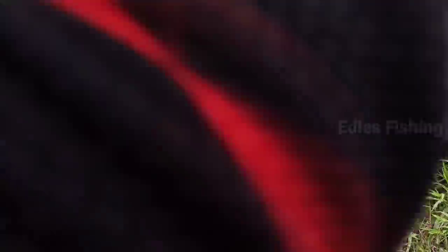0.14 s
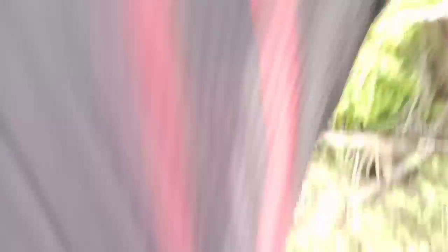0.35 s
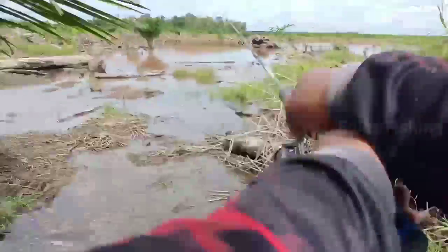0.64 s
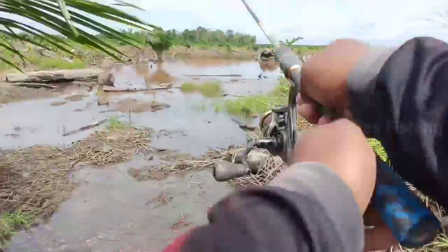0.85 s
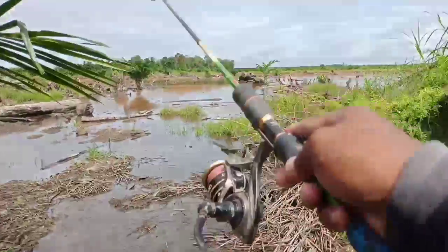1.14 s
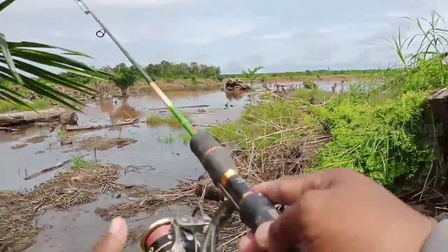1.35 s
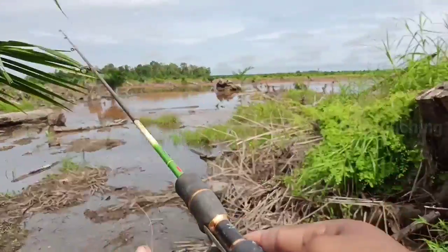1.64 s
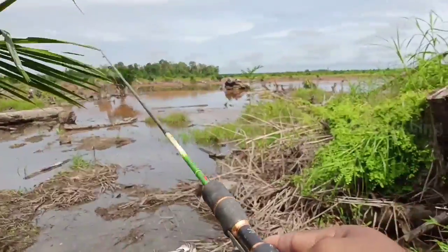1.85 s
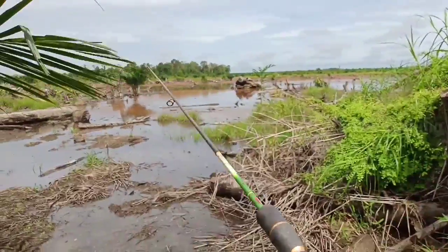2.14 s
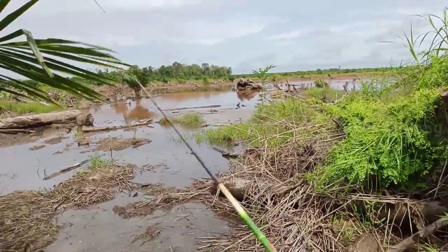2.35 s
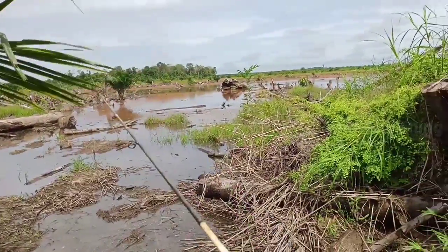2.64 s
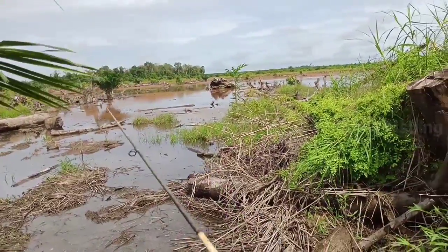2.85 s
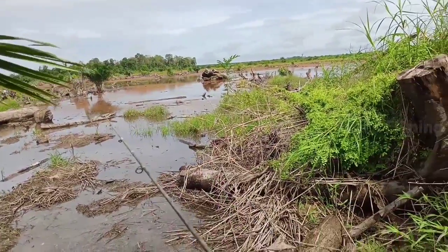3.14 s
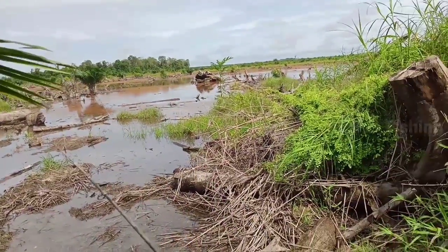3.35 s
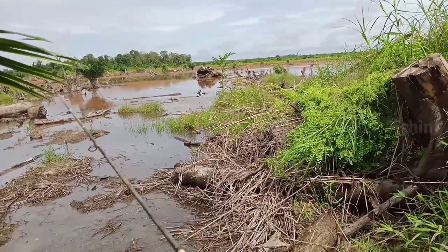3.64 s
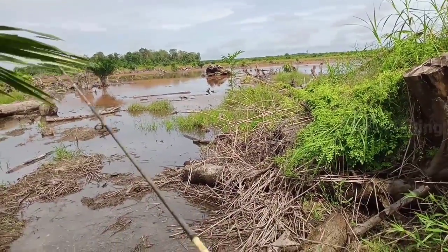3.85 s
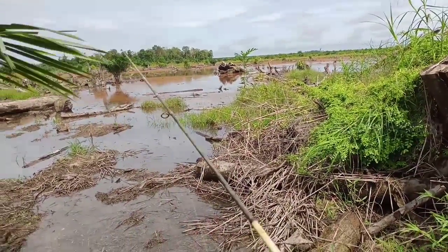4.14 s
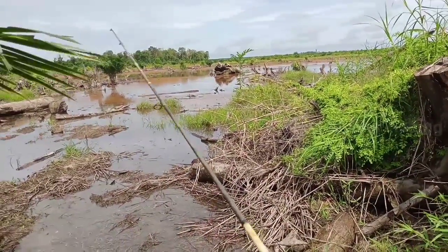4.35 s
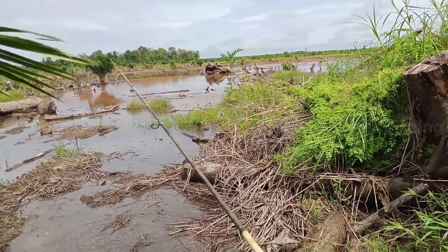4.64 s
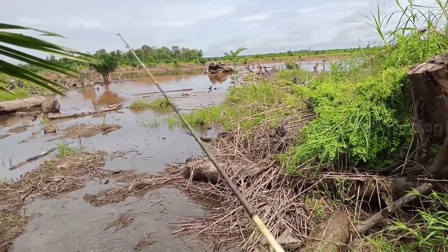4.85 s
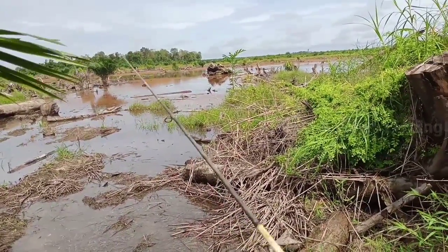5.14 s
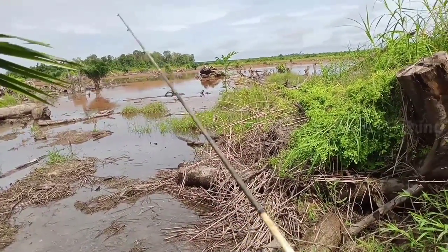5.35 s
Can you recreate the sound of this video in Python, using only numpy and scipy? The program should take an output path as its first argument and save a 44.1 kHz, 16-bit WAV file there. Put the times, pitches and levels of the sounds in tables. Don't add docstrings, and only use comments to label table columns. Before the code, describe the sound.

Outdoors at a swamp, with the microphone on the angler's chest. A high, thin cricket whine, a hissing band of far katydids and soft air noise run throughout. A frog gives four quick falling chirps in two pairs, about every 0.6 seconds, faint near the cast. After a small click at 0.27, the sleeve rustles and at 0.4 to 0.5 sweeps past in a loud rush of crackling cloth snaps, with the rod's brief whip. From 0.58 to 0.85 the spool rattles rapidly, metallic and dry, then thins to scattered ticks until about 1.7. A dull strap bump comes at 1.57. At 1.8 the bail snaps shut, a bright bouncing clack. Handle clicks follow at 3.17 and, harder, 3.33, then lighter ones at 3.83 and a tiny line squeak at 4.03. Cloth shifts softly. Distant birds whistle from 2.3 and rasp huskily from 4.0 to 5.1. Light puffs brush the microphone.

```python
import sys
import numpy as np
from scipy import signal
from scipy.fft import rfft, irfft, next_fast_len
from scipy.io import wavfile
from scipy.ndimage import map_coordinates

SR = 44100
rng = np.random.default_rng(int(sys.argv[2]) if len(sys.argv) > 2 else 0)


def volts_from_db(level):
    exponent = np.asarray(level, float) / 20
    return 10 ** exponent


def put_to_file(sound):
    columns = np.atleast_2d(sound).T
    safe = np.clip(columns, -1, 1)
    whole_steps = np.round(safe * 32767)
    wavfile.write(sys.argv[1], SR, whole_steps.astype(np.int16))


N = 242550

# (time [s], effort [dB], brightness [dB])
CAST = [
    (0, -56.5, 6),
    (.24, -54, 2.5),
    (.34, -48, 4),
    (.4, -46.5, -5.5),
    (.426, -41.5, -2),
    (.434, -32, -3),
    (.455, -29, -3),
    (.495, -35, 3),
    (.55, -45, 6),
]
EFFORT_DB = -54
# (time [s], peak [dB], mode [Hz])
RATTLE = [(0.5774, -34, 2150), (0.5901, -35, 2380), (0.6044, -38, 2440), (0.6164, -33, 2150),
          (0.6244, -34, 2400), (0.6374, -32, 2490), (0.6514, -39, 2860), (0.6663, -35, 2540),
          (0.6796, -29, 2420), (0.6914, -33, 2830), (0.7056, -25, 2400), (0.7174, -30, 2040),
          (0.732, -26, 2820), (0.7438, -31, 2920), (0.7612, -33, 2450), (0.7764, -34, 2420),
          (0.7816, -29, 2400), (0.7914, -33, 2400), (0.7981, -27, 2820), (0.8074, -29, 2420),
          (0.8154, -31, 2760), (0.8244, -33, 2380), (0.851, -37, 2380), (0.868, -29.5, 2580),
          (0.9168, -32, 2770), (0.9672, -33, 2520), (1.0026, -37, 2500), (1.0211, -34, 2850),
          (1.0959, -38, 2850), (1.116, -42, 2510), (1.1383, -49, 2080), (1.1588, -39, 2850),
          (1.162, -43, 2490), (1.1865, -31.5, 2500), (1.2545, -49, 2110), (1.2757, -39, 2870),
          (1.3106, -36.5, 2850), (1.5728, -40, 2860)]


def unit(x):
    return x / np.sqrt(np.mean(x ** 2) + 1e-20)


def noise():
    return rng.standard_normal(N)


def curves(rows):
    s, *cols = np.transpose(rows)
    return [np.interp(np.arange(N) / SR, s, c) for c in cols]


def wobble(rate_hz):
    coarse = np.arange(0, N + 8, 8)
    knots = rng.standard_normal(int(N * rate_hz / SR) + 4)
    smooth = map_coordinates(knots, [coarse * rate_hz / SR])
    return np.interp(np.arange(N), coarse, smooth)


def swells(rows, fade_db_per_s):
    t = np.arange(0, N + 32, 32) / SR
    gains = []
    for s, hold_s, db, *_ in rows:
        outside_s = np.maximum(np.maximum(s - t, t - s - hold_s), 0)
        gains.append(np.interp(np.arange(N) / SR, t, volts_from_db(db - fade_db_per_s * outside_s)))
    return gains


def filtered(x, response):
    m = next_fast_len(N + 8192)
    return irfft(rfft(x, m) * response(np.fft.rfftfreq(m, 1 / SR)), m)[:N]


def coloured(x, spectrum):
    f, db = np.transpose(spectrum)
    return unit(filtered(x, lambda hz: volts_from_db(np.interp(np.log(hz + 1), np.log(f), db))))


def ringing(x, modes):
    def response(f):
        total = 0
        for k, (hz, width_hz, db) in enumerate(modes):
            damping = 1j * f * width_hz
            total = total + (-1) ** k * volts_from_db(db) * damping / (hz * hz - f * f + damping)
        return total
    return filtered(x, response)


def add(out, s, burst):
    at = round(s * SR) + np.arange(len(burst))
    keep = (at >= 0) & (at < N)
    out[at[keep]] += burst[keep]


def glide(hz, rough_db=0):
    n = len(hz)
    flutter = np.interp(np.linspace(0, n * 250 / SR, n), np.arange(64), rng.standard_normal(64))
    edge_s = np.minimum(np.arange(n), np.arange(n)[::-1]) / SR
    tone = np.sin(2 * np.pi * np.cumsum(hz) / SR)
    return tone * np.minimum(edge_s / .004, 1) * volts_from_db(rough_db * flutter)


def puffs(rows):
    out, hiss = np.zeros(N), rng.standard_normal(SR // 4)
    for s, length_s, hz, width_hz, db in rows:
        band = signal.butter(2, [hz - width_hz / 2, hz + width_hz / 2], "bandpass", fs=SR)
        burst = unit(signal.lfilter(*band, rng.permutation(hiss)))[-int(length_s * SR):]
        add(out, s, volts_from_db(db) * burst * np.hanning(len(burst)) ** 0.32)
    return out


def crack(t60_s, tail_t60_s, tail_db):
    t = np.arange(SR // 12) / SR
    blow = 5 * (t == 0)
    decay = volts_from_db(-60 * t / t60_s) + volts_from_db(tail_db - 60 * t / tail_t60_s)
    return blow + decay * rng.standard_normal(len(t))


def background():
    # (frequency [Hz], density [dB/Hz])
    air_spectrum = [(20, -43.5), (33, -46), (48, 3), (65, 2.5), (120, -6), (400, -15.5), (1500, -20),
                    (3500, -25.5), (4300, -27), (5000, -35), (6600, -27), (10500, -32), (13500, -52),
                    (15400, -40)]
    # (frequency [Hz], density [dB/Hz])
    port_spectrum = [(50, -32), (110, 1.5), (170, -1), (270, 3), (420, -9), (700, -46)]
    # (time [s], hold [s], level [dB])
    gusts = [
        (1.15, 0.009, -51.5),
        (1.32, 0.0585, -64),
        (1.58, 0.0091, -64),
        (1.82, 0.0043, -45.5),
        (2.1, 0.17, -59),
        (2.66, 0.012, -51),
    ]
    # (frequency [Hz], width [Hz], level [dB])
    katydids = [(7940, 770, -3), (8250, 140, 2.5), (8600, 330, -3.5), (9157, 520, -0.5), (9630, 440, -5)]
    air = coloured(noise(), air_spectrum) * volts_from_db(-56.5 + 1.3 * wobble(2.72))
    effort_db = curves(CAST + [(.62, -60.5, 0)])[0]
    draught = volts_from_db(-63 + 1.295 * (effort_db - EFFORT_DB))
    push = volts_from_db(-67) + draught + sum(swells(gusts, fade_db_per_s=265))
    breeze = coloured(noise(), port_spectrum) * push * volts_from_db(-5.5 + 2.4 * wobble(8.9))
    chorus = unit(ringing(ringing(noise(), katydids), katydids))
    return air + breeze + chorus * volts_from_db(-64 + 0.38 * wobble(3.96) + 2.2 * wobble(30))


def crickets():
    # (wing [Hz], chirps [1/s], pitch wander [Hz], neighbour share [ratio])
    wings = [
        (5741, 11.5, 7, .55),
        (5602, 12.5, 8, .7),
        (5435, 9, 12, .6),
        (12620, 7, 8, .3),
    ]
    # (time [s], first singer [dB], second singer [dB])
    song = [(0, -60, -62), (.6, -58, -97), (1.3, -58, -58.5), (1.6, -57, -64), (1.9, -60, -74),
            (2.2, -53.5, -58.5), (2.6, -56.5, -66), (3, -62.5, -63.5), (3.5, -65, -61.5), (4, -59.5, -59),
            (4.45, -62, -63), (5.1, -60, -63.5), (5.5, -63, -56.5)]
    # (time [s], hold [s], level [dB])
    low_bouts = [
        (1.3, 0.085, -79.5),
        (4.2, 0.44, -75),
        (5.1, .4, -74.5),
    ]
    # (time [s], hold [s], level [dB])
    high_bouts = [
        (2.6, .1, -93.5),
        (3.85, .5, -86.5),
    ]
    # (frequency [Hz], density [dB/Hz])
    crowd_spectrum = [(5250, -40), (5380, -10), (5520, -3), (5600, 0), (5680, -1), (5790, 0), (5830, -25),
                      (5950, -50)]
    first_db, second_db = curves(song)
    low = volts_from_db(-79.5) + sum(swells(low_bouts, fade_db_per_s=40))
    high = volts_from_db(-100) + sum(swells(high_bouts, fade_db_per_s=40))
    gains = [volts_from_db(first_db), volts_from_db(second_db), low, high]
    crowd_db = -66 - 0.4 * np.clip(second_db - second_db.mean(), -7, 9)
    out = volts_from_db(crowd_db + 1.2 * wobble(20)) * coloured(noise(), crowd_spectrum)
    for (hz, rate_hz, wander_hz, share), gain in zip(wings, gains):
        beat = np.cumsum(rate_hz * (1 + 0.125 * wobble(5))) / SR % 1
        gate = np.clip(1.9 * np.sin(np.pi * beat), 0, 1) ** 1.04
        pitch_hz = hz + wander_hz * wobble(30) + .8 * wander_hz * wobble(2)
        pitch_hz = pitch_hz - 14 * (beat - .5)
        near = gate * volts_from_db(1.22 * wobble(13)) * np.sin(2 * np.pi * np.cumsum(pitch_hz) / SR)
        phase = 2 * np.pi * hz * np.arange(N) / SR
        others = wobble(80) * np.cos(phase) + wobble(80) * np.sin(phase)
        out += gain * unit(unit(near) + share * unit(others))
    return out


def cloth():
    # (time [s], effort [dB], brightness [dB])
    follow = [
        (.732, -43, 10.5),
        (.84, -48.5, 12),
        (1.0, -49, 11),
        (1.19, -52, 5),
        (1.22, -56.5, 6),
        (1.68, -59, 4.5),
        (1.9, -66, 7),
        (1.93, -88, -9.5),
    ]
    # (time [s], hold [s], effort [dB], brightness [dB])
    shifts = [(2.048, 0.48, -60, 1), (2.35, 0.34, -58.5, -1), (2.894, 0.045, -52, 7),
              (3.085, 0.0103, -58.5, 3), (3.151, 0.19, -61.5, 3), (3.455, 0.077, -60.5, 8),
              (3.737, 0.13, -62.5, 2.5), (3.864, 0.2, -63.5, 4), (4.16, 0.0092, -65, -4),
              (4.318, 0.053, -77.5, -10), (5.176, 0.0081, -58.5, 3.5), (5.49, .01, -81, 3.5)]
    # (frequency [Hz], density [dB/Hz])
    flap = [(200, -4.5), (400, -1.5), (750, -3), (1000, -1), (1400, -8.5), (2200, -26.5)]
    swish = [(700, -34), (1300, -2), (2000, 1.5), (2800, -2.5), (3600, 2.5), (4200, -5), (4900, -7.5),
             (6200, -13.5), (7500, -49.5)]
    hiss = [(5000, -31), (6500, -7.5), (8000, 0), (8800, 2.5), (9800, -2.5), (11000, -9.5), (13000, -74)]
    sheen = [(9000, -31), (11000, 0), (13000, -1), (15400, 0.5), (17000, -30)]
    # (level at EFFORT_DB [dB], effort slope [dB/dB], brightness slope [dB/dB], rest [dB])
    weave = [
        (-60, 1.0726, -0.4784, -78.5),
        (-55.5, 0.9486, -0.93, -74),
        (-56, 1.0218, -0.0059, -85),
        (-67.5, 1.0737, -0.24, -78),
    ]
    shared = wobble(24.96) + 0.46 * wobble(160)
    effort_db, bright_db = curves(CAST + follow)
    shapes = swells([(s, hold_s, 0) for s, hold_s, *_ in shifts], fade_db_per_s=208.5)
    out = np.zeros(N)
    for colour, (base_db, grows, tilt, rest_db) in zip([flap, swish, hiss, sheen], weave):
        def law(effort, bright):
            return volts_from_db(base_db + grows * (effort - EFFORT_DB) + tilt * bright)
        shifting = np.max([law(*row[2:]) * shape for row, shape in zip(shifts, shapes)], axis=0)
        gain = volts_from_db(rest_db) + law(effort_db, bright_db) + shifting
        grains = volts_from_db(1.1 * shared + 1.5 * wobble(60) + 3 * wobble(700))
        out += gain * coloured(grains * noise(), colour)
    return out


def frog():
    # (first note [s], level [dB])
    phrases = [
        (-.15, -51.5),
        (.5, -67.5),
        (1.127, -56),
        (1.741, -52.5),
        (2.341, -57),
        (3.02, -54.5),
        (3.638, -54),
        (4.242, -54),
        (4.838, -53.5),
        (5.439, -53.5),
    ]
    # (delay [s], length [s], level [dB])
    notes_in_phrase = [
        (0, .018, -3),
        (.044, .019, -3),
        (.131, .02, -.5),
        (.176, .03, -1),
    ]
    out = np.zeros(N)
    for s, db in phrases:
        for delay_s, length_s, note_db in notes_in_phrase:
            t = np.arange(int(length_s * SR)) / SR
            pitch_hz = 1440 + 1180 * np.exp(-(t / .009) ** 1.7)
            add(out, s + delay_s - .005, volts_from_db(db + note_db) * glide(pitch_hz, rough_db=2))
    out = out + volts_from_db(-8) * np.roll(out, round(.006 * SR)) + volts_from_db(-13) * np.roll(out, round(0.011 * SR))
    return ringing(out, [(1566, 248, -1.5), (2250, 390, 3.1)])


def reel():
    # (time [s], snap [dB], body [dB], knock [dB])
    bail = [(1.7975, -28, -36, -59), (1.7995, -11, -38, -56), (1.8045, -25, -36, -53.5),
            (1.8057, -16, -32, -42), (1.8064, -6, -25, -32.5), (1.8074, -17, -26, -31),
            (1.8108, -25.5, -36, -35.5), (1.8144, -20.5, -36, -33), (1.8182, -22, -30, -34),
            (1.8205, -24, -32, -39), (1.8245, -32, -38.5, -54), (1.836, -44, -51, -47),
            (1.841, -44, -46, -38), (1.8545, -47, -39, -43), (1.8697, -40, -39, -44),
            (1.8778, -20.5, -37, -46)]
    # (time [s], snap [dB], body [dB], knock [dB], body ring [Hz])
    handle = [(3.1726, -20, -37, -53, 3390), (3.2438, -52, -36.5, -37.5, 2100),
              (3.2967, -63, -55, -44, 2000), (3.3025, -39, -45, -45, 3240),
              (3.3048, -37.5, -44.5, -47, 2600), (3.3155, -56.5, -59.5, -41, 2050),
              (3.326, -46, -55, -41.5, 1900), (3.3305, -15, -31.5, -30.5, 3560),
              (3.377, -60, -50, -50, 2250), (3.4173, -58, -57.5, -47, 2000),
              (3.4321, -59.5, -39.5, -42.5, 2040)]
    # (time [s], snap [dB], body [dB], knock [dB], body ring [Hz])
    clicks = [(0.1013, -49, -54, -54, 3050), (0.146, -42, -48, -52, 3010), (0.2733, -24.5, -45, -61, 4050),
              (1.9855, -35, -46, -51, 2370), (1.989, -41, -45, -66, 3300), (2.0021, -51, -52.5, -63, 2600),
              (2.064, -51.5, -53, -52, 2550), (3.52, -45.5, -51, -52, 2510),
              (3.5414, -45, -61.5, -49, 2240), (3.7454, -41, -60.5, -58, 2130),
              (3.8313, -26.5, -38.5, -49.5, 3500), (3.839, -35, -41, -49, 3550),
              (3.861, -42, -53.5, -67.5, 3620), (4.0339, -35, -43.5, -43, 3440),
              (4.4477, -43.5, -66, -57.5, 2280), (4.4944, -49, -69.5, -67, 2080),
              (4.636, -50, -50, -49, 3300), (4.645, -52, -55, -50, 3000), (4.775, -60, -61, -51, 2970),
              (4.9347, -50, -62, -60, 3180), (5.132, -54, -62, -46, 3830), (5.1877, -50, -56, -52, 2050)]
    # (time [s], peak [dB])
    ticks = [(0.659, -29), (.664, -32), (0.67, -22.5), (.6854, -22.5), (.7105, -30), (0.723, -30),
             (.7377, -28), (.751, -25), (.783, -31), (.789, -30), (.8064, -29), (.8165, -30), (1.0774, -42),
             (.9165, -39), (1.005, -34), (1.098, -36), (1.158, -40), (1.1702, -36), (1.187, -30),
             (1.214, -39), (1.261, -40), (1.3798, -39.5), (1.3989, -33), (1.5532, -37), (1.5905, -33.5),
             (1.719, -40), (1.7649, -36)]
    # (time [s], level [dB])
    wire = [
        (.2735, -46),
        (1.819, -45.5),
        (1.8784, -57.5),
    ]
    # (time [s], frequency [Hz], level [dB], t60 [s])
    parts = [(1.8065, 10760, -15, .006), (1.8078, 1760, -26, 0.014), (1.8195, 870, -25.5, 0.023),
             (1.8245, 1250, -39, .015), (1.871, 1100, -39, 0.029), (1.879, 1000, -40, .02),
             (3.1728, 1800, -32.5, 0.0072), (3.3315, 1135, -32, 0.032), (3.3315, 3620, -31, .012),
             (3.386, 3820, -50, .04), (3.4325, 3600, -37, .006), (3.3315, 8970, -21, .012),
             (3.8318, 13400, -33, .008), (3.8395, 10600, -36, 0.0089), (4.0345, 13200, -49, .012)]
    # (frequency [Hz], width [Hz], level [dB])
    snap_modes = [(6370, 4700, -15), (8900, 2000, -0.5), (12600, 3700, -15.5), (15000, 1500, -21)]
    body_modes = [(2037, 4700, -3.5), (2683, 890, 4), (3700, 900, -1.5)]
    knock_modes = [(237, 23.7, -38), (720, 250, -3), (1100, 160, 1.5), (1650, 310, -0.5)]
    snap, body, knock, ring = np.zeros((4, N))
    t = np.arange(SR // 40) / SR
    for s, snap_db, body_db, knock_db, *ring_hz in [*bail, *handle, *clicks]:
        add(snap, s + 0.00061, volts_from_db(snap_db + 1.0) * crack(0.0031, 0.064, -17.0))
        add(body, s + .0004, volts_from_db(body_db + 3.0) * crack(0.0097, 0.045, -9.5))
        add(knock, s + .0004, volts_from_db(knock_db + 15.0) * crack(0.0014, 0.049, -9.0))
        for hz in ring_hz:
            decay = volts_from_db(body_db + 9.5 - 60 * t / 0.0083) * (1 - np.exp(-t / 0.00056))
            add(ring, s + 0.00048, decay * np.sin(2 * np.pi * hz * t))
    for s, db in wire:
        add(ring, s, volts_from_db(db - 60 * t / 0.043) * np.sin(2 * np.pi * 12994 * t))
    for s, hz, db, t60_s in parts:
        decay = volts_from_db(db - 60 * t / t60_s) * (1 - np.exp(-t / 0.00043))
        add(ring, s, decay * np.sin(2 * np.pi * hz * t))
    for s, db in ticks + [(s, db - 8) for s, db, _ in RATTLE]:
        add(snap, s, volts_from_db(db + 2.0) * crack(0.0041, 0.022, -30))
    body = ringing(ringing(body, body_modes), [(2820, 5240, 0.37)])
    knock = ringing(ringing(knock, knock_modes), [(900, 12000, 0.23)])
    return ringing(snap, snap_modes) + body + knock + ring


def rod():
    # (time [s], length [s], frequency [Hz], width [Hz], level [dB])
    whips = [
        (.31, 0.093, 1650, 700, -47),
        (.405, 0.043, 870, 800, -35.5),
        (.29, 0.089, 3660, 1000, -50.5),
        (.443, 0.032, 2664, 900, -24.5),
        (.462, 0.04, 2150, 1100, -30.5),
        (.478, 0.05, 720, 292, -36),
        (2.86, 0.111, 1910, 600, -58),
    ]
    return puffs(whips)


def folds():
    # (time [s], level [dB])
    snaps = [(.4062, -29), (.411, -27), (.4295, -22), (.4325, -20), (0.4402, -18), (.448, -11),
             (0.4527, -11.5), (0.458, -16), (.464, -15), (0.466, -14), (.4725, -19), (0.4781, -19.5),
             (0.484, -19), (0.487, -30), (0.491, -24), (0.5098, -23), (.518, -27)]
    # (frequency [Hz], width [Hz], level [dB])
    fold_bands = [(800, 1150, -6), (2720, 2000, -0.5), (8860, 820, 0.5), (14000, 2500, -17)]
    out, t = np.zeros(N), np.arange(SR // 50) / SR
    for s, db in snaps:
        add(out, s, volts_from_db(db + 2.5 - 60 * t / 0.013) * rng.standard_normal(len(t)))
    return ringing(out, fold_bands)


def spool():
    # (time [s], level [dB])
    whirr = [
        (.5, -57),
        (.58, -50),
        (.65, -44),
        (.72, -44.5),
        (.8, -45),
        (.845, -55),
        (1, -58),
        (1.2, -62),
        (1.35, -68),
    ]
    # (frequency [Hz], width [Hz], level [dB])
    frame = [(682, 160, 2.5), (2100, 41, 1), (2430, 74, 1), (2910, 113, 0.5), (3300, 250, -8),
             (4320, 350, -5)]
    side_modes_hz = [2150, 2450, 2830, 3250, 2620]
    hits = rng.random(N) < 700 / SR
    force = volts_from_db(2.4 * np.minimum(rng.exponential(size=N), np.pi))
    knocks = hits * force * rng.choice([-1, 1], size=N)
    out = volts_from_db(curves(whirr)[0]) * unit(ringing(ringing(knocks, frame), [(2280, 2000, 0)]))
    t = np.arange(SR // 20) / SR
    for s, db, hz in RATTLE:
        modes = np.sin(2 * np.pi * hz * t)
        for side_hz in side_modes_hz:
            decay = volts_from_db(rng.normal(-8, 3.0) - 60 * t / .03)
            phase = 2 * np.pi * side_hz * rng.normal(1, 0.017) * t + 2 * np.pi * rng.random()
            modes += decay * np.sin(phase)
        add(out, s, volts_from_db(db - 1.5 - 60 * t / 0.017) * (1 - np.exp(-t / 0.0004)) * modes)
    return out


def bumps():
    # (time [s], frequency [Hz], length [s], level [dB])
    strap = [
        (1.3, 160, 0.097, -53),
        (1.57, 97.5, 0.042, -42),
        (2.64, 199, 0.07, -73),
        (5.17, 93.3, 0.058, -56),
    ]
    out = np.zeros(N)
    for s, hz, length_s, db in strap:
        push = glide(np.full(int(length_s * SR), float(hz)))
        add(out, s, volts_from_db(db) * push * np.hanning(len(push)))
    return out


def birds():
    # (time [s], length [s], from [Hz], to [Hz], level [dB])
    whistles = [(2.27, .07, 4600, 5400, -67.5), (2.63, .03, 4700, 5100, -69), (2.677, .04, 4800, 5150, -67),
                (3.725, .03, 4800, 5400, -67), (3.763, 0.037, 4820, 6100, -61),
                (3.915, .03, 4900, 5500, -81), (4.08, 0.063, 5060, 6300, -66),
                (4.465, .07, 5100, 6150, -71), (4.88, .03, 5000, 5200, -75), (4.935, .03, 5900, 6800, -70)]
    # (time [s], length [s], frequency [Hz], width [Hz], level [dB])
    rasps = [
        (4.002, 0.06, 3700, 1100, -57),
        (4.138, 0.077, 3770, 900, -57.5),
        (4.289, 0.068, 3670, 800, -58),
        (4.859, 0.075, 3500, 800, -62),
        (5.059, 0.042, 2000, 604, -58),
    ]
    out = puffs(rasps)
    for s, length_s, from_hz, to_hz, db in whistles:
        pitch_hz = np.linspace(from_hz, to_hz, int(length_s * SR))
        add(out, s, volts_from_db(db) * glide(pitch_hz, rough_db=3.5))
    return out


def squeak():
    # (time [s], length [s], from [Hz], to [Hz], level [dB])
    s, length_s, from_hz, to_hz, db = (4.0345, .0095, 3250, 4350, -40)
    out = np.zeros(N)
    rise = np.linspace(0, 1, int(length_s * SR))
    phase = 2 * np.pi * np.cumsum(from_hz + (to_hz - from_hz) * rise) / SR
    tone = np.sin(phase) + volts_from_db(-5) * np.sin(2 * phase)
    add(out, s, volts_from_db(db) * np.sin(np.pi * rise) ** 0.52 * tone)
    return out


def scene():
    nature = background() + crickets() + frog() + birds()
    sleeve = cloth() + folds()
    tackle = reel() + rod() + spool() + squeak()
    return (nature + sleeve + tackle + bumps())[None]


def band_limit(x):
    return signal.sosfilt(signal.butter(12, 16640, fs=SR, output="sos"), x)


def record(dry):
    shelved = filtered(dry[0], lambda hz: np.where(hz < 15480, 1, volts_from_db(-27.5)))
    return band_limit(shelved[None])


dry = scene()
out = record(dry)
put_to_file(out)
```